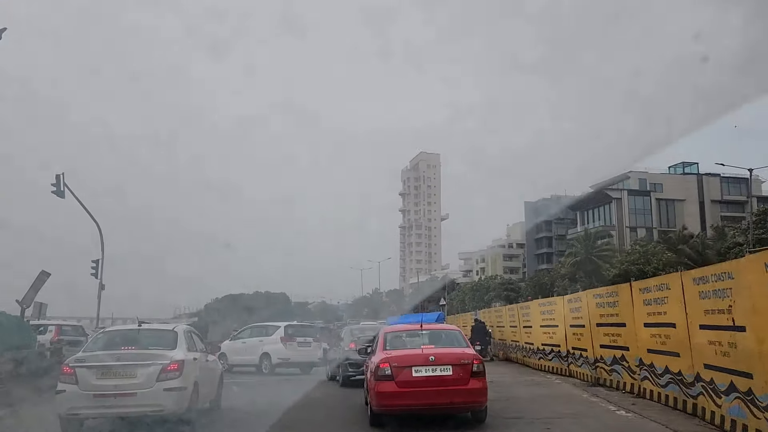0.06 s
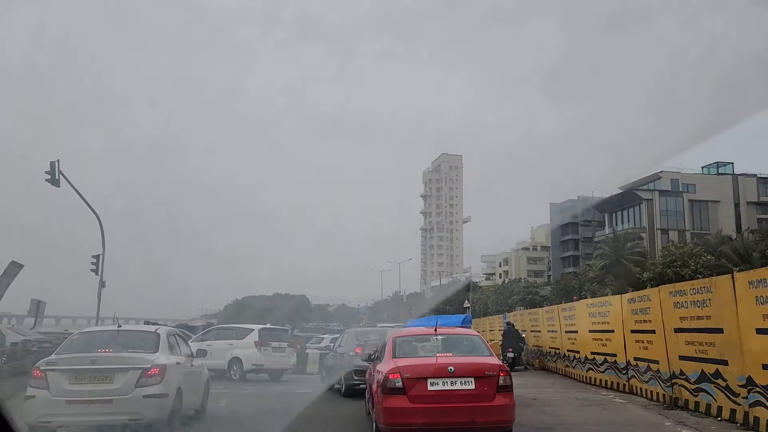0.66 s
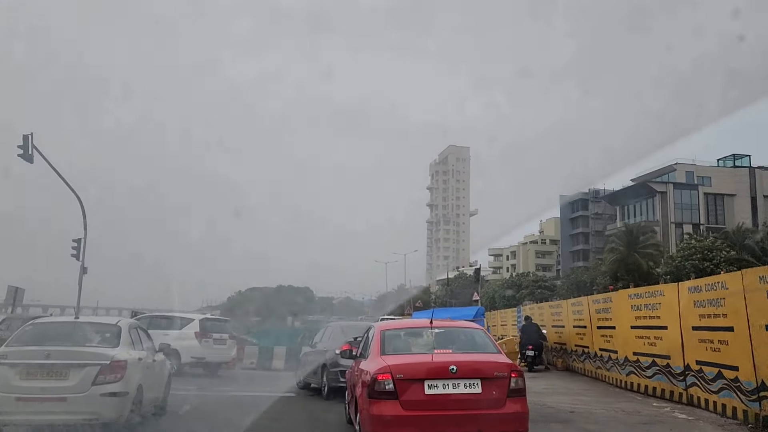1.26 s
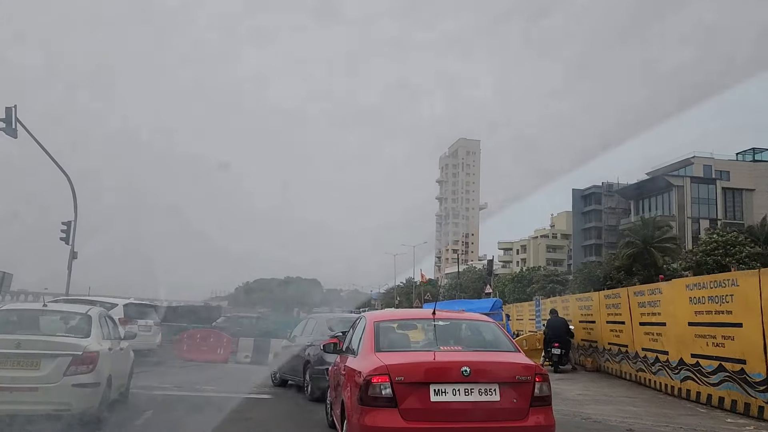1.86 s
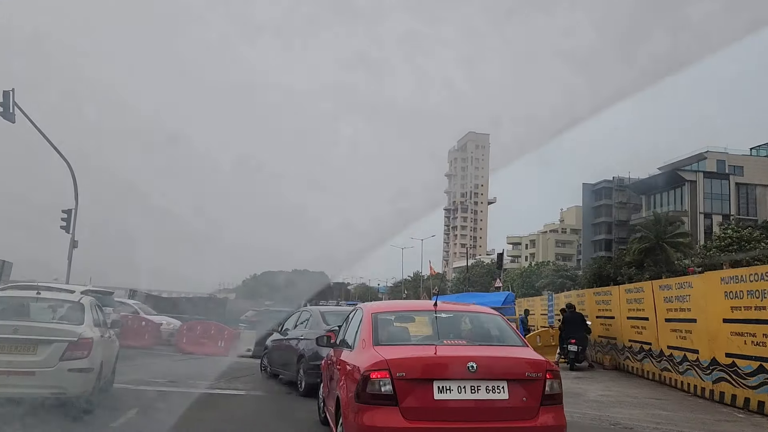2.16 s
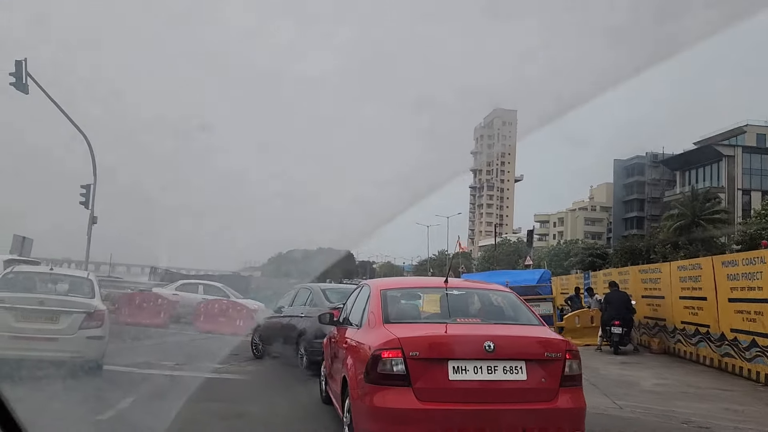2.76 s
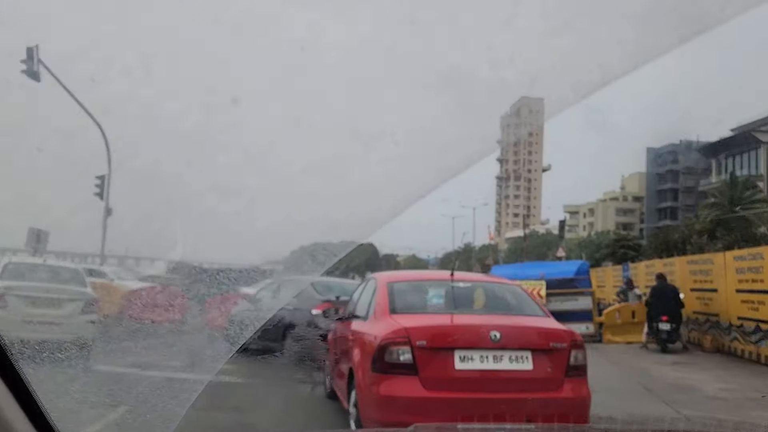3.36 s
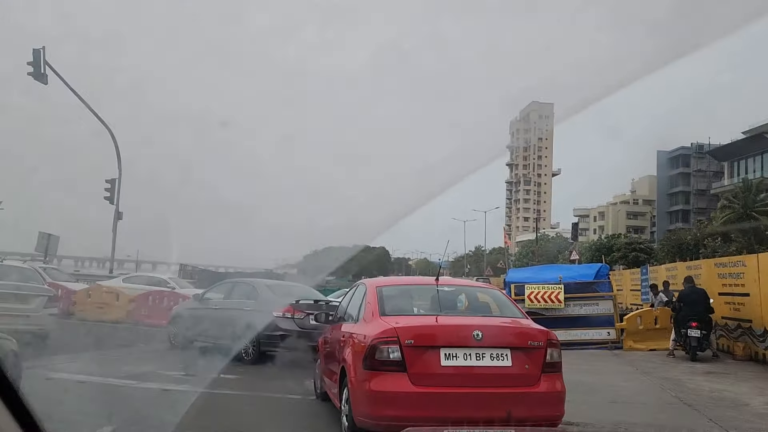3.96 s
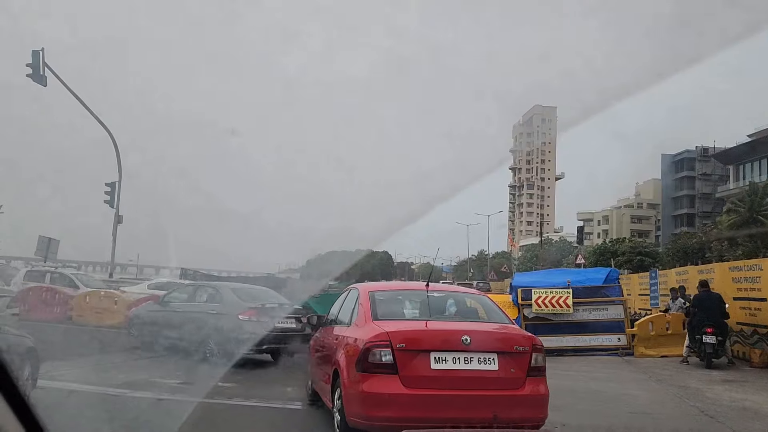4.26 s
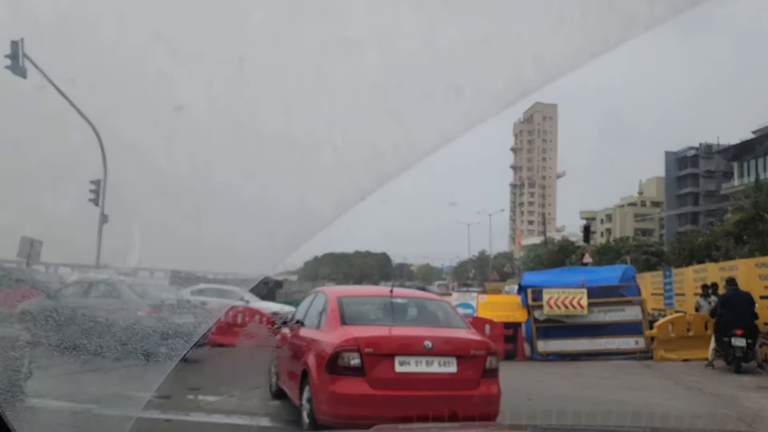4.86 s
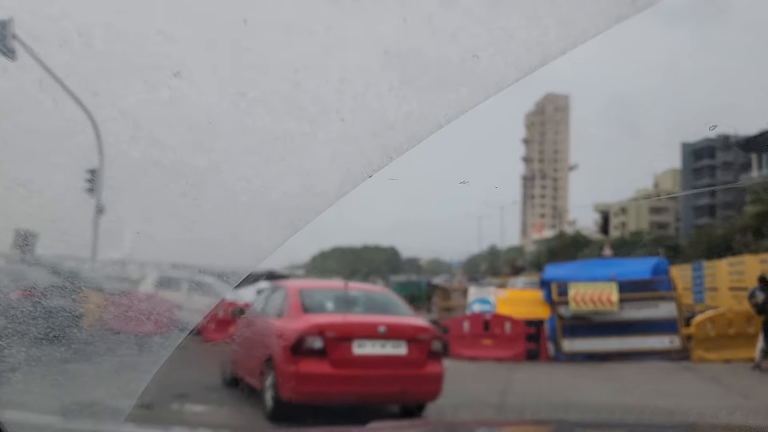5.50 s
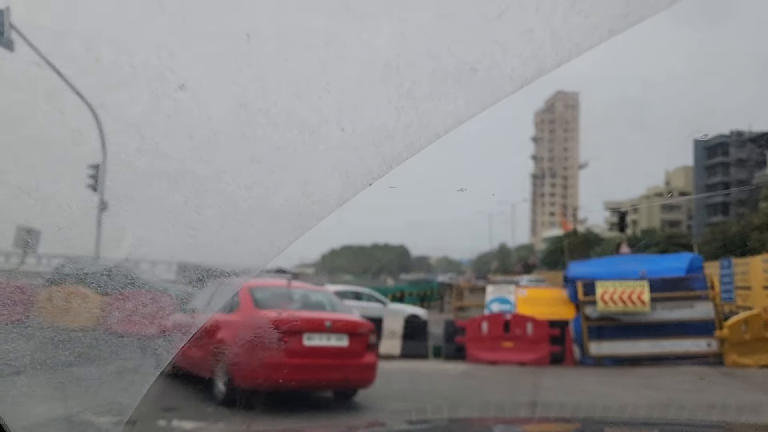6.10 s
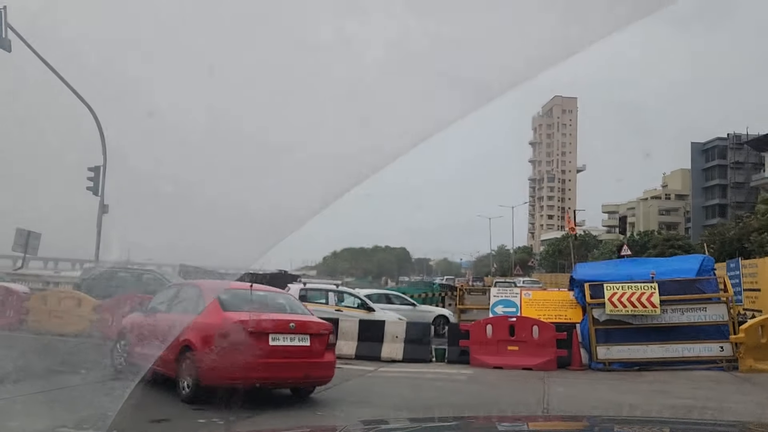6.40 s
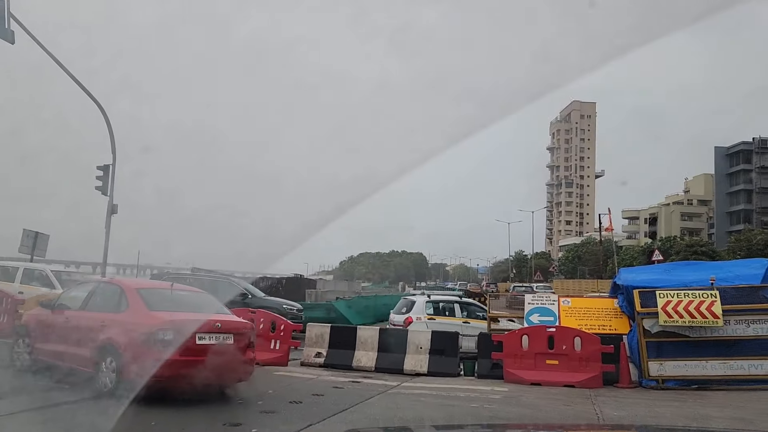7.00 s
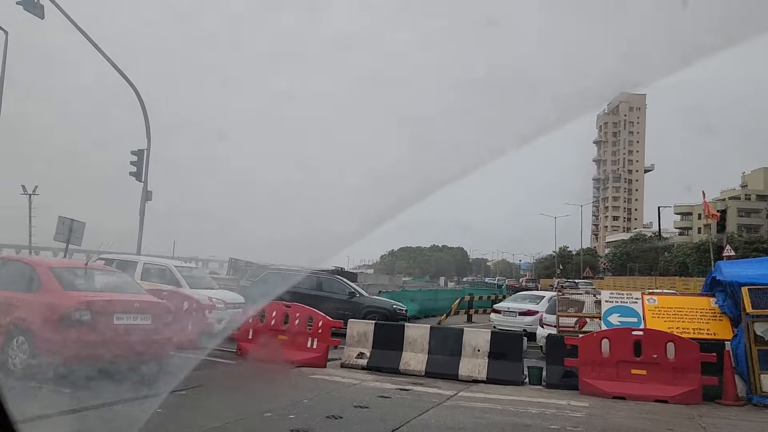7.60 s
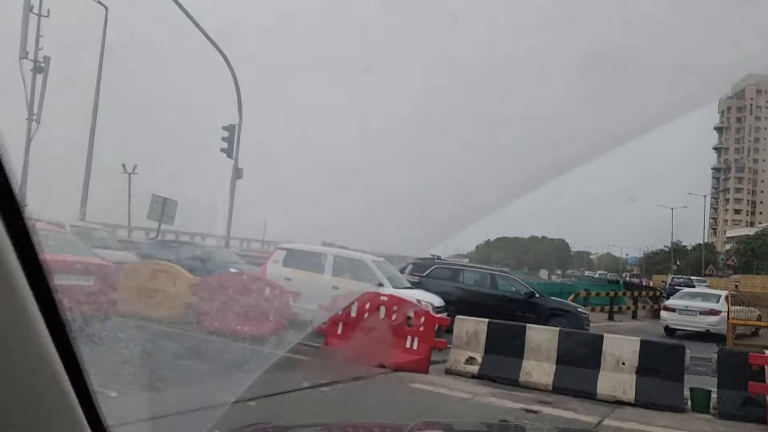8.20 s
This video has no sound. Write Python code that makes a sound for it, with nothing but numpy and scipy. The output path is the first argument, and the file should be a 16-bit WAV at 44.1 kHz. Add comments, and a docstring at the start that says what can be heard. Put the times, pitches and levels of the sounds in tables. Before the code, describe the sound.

Heard from the cabin, a car rumbles slowly along, settles to idle and accelerates gently under a steady rush of vent air.

```python
"""Inside a small car in slow traffic. Vents blow throughout; air noise rings in the cabin's resonances.
First the car creeps: tyres rumble and boom through the body, the trim ticks and rustles.
From 1 s brakes sing faintly; the engine's firing hum sinks to idle by 2.6 s.
A plastic panel knocks twice near 3 s; a soft cabin hum swells near 4 s; one thin squeak at 4.6 s.
From 5.7 s the engine lugs and pulls away, with brief high squeals, intake hiss, bumps and rustles."""
import sys
import numpy as np
from scipy import signal
from scipy.fft import rfft, irfft
from scipy.io import wavfile
from scipy.ndimage import uniform_filter1d

SR = 44100
rng = np.random.default_rng(int(sys.argv[2]) if len(sys.argv) > 2 else 0)


def generate_wav(signal):
    """Clip the signal to [-1, 1] and save it as 16-bit WAV at the path in sys.argv[1]."""
    frames = np.transpose(np.atleast_2d(signal))
    scaled = np.clip(frames, -1, 1) * 32767
    pcm = np.round(scaled).astype(np.int16)
    wavfile.write(sys.argv[1], SR, pcm)


N = 363825
T = np.arange(N) / SR
HZ = np.fft.rfftfreq(N, 1 / SR)

# road roughness: t/s, relative level/dB
ROAD_ROUGHNESS = [(0, -24), (.75, -19.5), (1.7, -22.5), (2.7, -29.5), (4.2, -30.5), (5.3, -30.5),
                  (6.1, -28.5), (7, -27), (8.25, -25.5)]
# engine run: t/s, firing rate/Hz, level/dB
ENGINE_RUN = [(0.0, 33.1, -28), (0.37, 33, -27), (0.82, 32.58, -30), (1.08, 33.36, -22), (1.28, 32.93, -24),
              (1.65, 31.8, -23), (2.04, 29.44, -44), (2.59, 26.07, -42), (3.2, 28.45, -26),
              (3.42, 25.46, -35.5), (5.7, 24.26, -36), (6.2, 28.45, -29), (6.54, 30.61, -29.5),
              (6.68, 32.62, -18), (6.88, 33.06, -13.5), (6.99, 33.6, -13), (7.05, 35.23, -25),
              (7.13, 37.5, -16.5), (7.33, 39.3, -22.5), (7.6, 43.38, -18.5), (7.94, 44.4, -32),
              (8.25, 44.2, -21.5)]


def gain_of(db):
    """Decibels to amplitude."""
    return 10 ** (np.asarray(db) / 20)


def unit_rms(x):
    """Scales to rms 1."""
    return x / np.sqrt(np.mean(x ** 2) + 1e-20)


def curve(rows, column=1):
    """One column of (t/s, ...) rows, interpolated over time."""
    columns = np.transpose(rows)
    return np.interp(T, columns[0], columns[column])


def spectrum(points):
    """(f/Hz, value) points, interpolated over log frequency."""
    hz, value = np.transpose(points)
    return np.interp(np.log(HZ + 1), np.log(hz + 1), value)


def noise(points):
    """Noise of rms 1, shaped by (f/Hz, density/dB) points."""
    return unit_rms(irfft(rfft(rng.standard_normal(N)) * gain_of(spectrum(points)), N))


def drift(rate_hz):
    """Low-passed random wander of rms 1."""
    return unit_rms(irfft(rfft(rng.standard_normal(N)) / (1 + (HZ / rate_hz) ** 4), N))


def panned(x, left_db):
    """Stereo placement by left-right level difference."""
    return x * gain_of(left_db * np.array([[.5], [-.5]]))


def add(mix, start_s, sound):
    """Adds a sound to the mix in place."""
    part = mix[max(round(start_s * SR), 0):][:len(sound)]
    part += sound[:len(part)]


def swells(rows, taper=1):
    """Smooth envelope of (t/s, length/s, level/dB) events; taper < 1 leaves a hold."""
    out = np.zeros(N)
    for start_s, length_s, db in rows:
        add(out, start_s, gain_of(db) * signal.windows.tukey(int(length_s * SR), taper))
    return out


def whistle(envelope, hz, wander_hz, wander_per_s, left_db, lead_rad, waver_db):
    """Thin tone wandering in pitch and level; fast wander makes it rough."""
    phase = 2 * np.pi * np.cumsum(hz + wander_hz * drift(wander_per_s)) / SR
    tone = np.sqrt(2) * np.sin([phase + lead_rad, phase])
    return panned(tone * envelope * gain_of(waver_db * drift(19)), left_db)


def vents(mid_db=-41, side_db=-47, flutter_db=0.94, idle_hz=26, rise_db_per_hz=0.068):
    """Fluttering rush of air, wide in the treble, growing slightly with engine speed."""
    mid_shape = [(110, -22), (180, -1.5), (220, -4), (340, -7), (480, -9.5), (650, -17), (1100, -24.5),
                 (1650, -26), (2150, -26), (2650, -31.5), (4700, -35.5), (5850, -37), (8000, -37.5),
                 (9700, -52.5), (15400, -60.5)]  # in-phase air: f/Hz, density/dB
    side_shape = [(60, -27), (110, -6), (220, -10), (420, -9.5), (650, -12), (1100, -17.5), (1650, -15),
                  (2650, -27.5), (4700, -27.5), (5850, -32.5), (8000, -37), (9700, -45.5), (15400, -53.5)]  # antiphase air: f/Hz, density/dB
    balance = [(150, 7), (400, 2.5), (600, 0.5), (1100, 2), (1600, 1.5), (2600, -1), (3800, -1.5),
               (5800, -1), (7300, 4.5), (8600, -3), (15000, 3)]  # stereo tilt: f/Hz, left-right/dB
    mid = gain_of(mid_db) * noise(mid_shape)
    side = gain_of(side_db) * noise(side_shape)
    rush = irfft(panned(rfft([mid + side, mid - side]), spectrum(balance)), N)
    return rush * gain_of(rise_db_per_hz * (curve(ENGINE_RUN) - idle_hz) + flutter_db * drift(22))


def cabin(swell_db=1.46, swells_per_s=2):
    """Standing waves excited by air and road noise, each slowly swelling and sinking."""
    # cabin and duct modes: f/Hz, width/Hz, level/dB, left-right/dB, left phase lead/rad
    modes = [(163.8, 45, -43, 0.5, 0), (281.3, 38, -47.5, 2, -1), (392.6, 58, -50, 2.5, 1),
             (605.3, 46, -52.5, 2.5, 1), (686, 34, -55, -1, 0.9), (750, 54, -55.5, -3, 1.5),
             (841, 69, -53.5, 2, -2), (939, 54, -61, -8, 1.4), (1010, 37, -62.5, 9.5, 1.5),
             (1093, 28, -65.5, 10, 1.5), (1193, 52, -64, 7.5, 2), (1325, 66, -57.5, -1, 2.5),
             (1417, 75, -61.5, 8, 1.5), (1540, 80, -59.5, -5.5, -2), (1730, 76, -64, 6.5, 2),
             (1943, 80, -64.5, 2.5, 1.5), (2136, 400, -60, -1.5, 1.5), (2750, 190, -70, 8, 2),
             (3040, 100, -65, 3.5, 4), (3440, 150, -69, 0.5, 2.5), (4170, 500, -69.5, -8.5, 0.5),
             (5370, 300, -71, 2.5, 2), (6550, 400, -67, -5, 3.5), (7370, 370, -68.5, -11, 2.5),
             (8380, 300, -73.5, 4.5, 2.5)]
    out = np.zeros((2, N))
    for hz, width_hz, db, left_db, lead_rad in modes:
        band = rfft(rng.standard_normal(N)) / (1 + ((HZ - hz) / (0.6 * width_hz)) ** 2)
        ring = irfft([band, band * np.exp(-1j * lead_rad)], N)
        ring *= gain_of(swell_db * drift(swells_per_s))
        out += gain_of(db) * panned(unit_rms(ring), left_db)
    return out


def fan(db=-67.5):
    """Thin, continuous whine, as of the fan motor."""
    return whistle(gain_of(db), hz=1513, wander_hz=2.54, wander_per_s=8.4,
                   left_db=-5.5, lead_rad=-1.8, waver_db=3.5)


def squeak(start_s=4.555, length_s=0.085, hz=11230, db=-65):
    """One thin, very high squeak on the left."""
    out, t = np.zeros(N), T[:int(length_s * SR)]
    add(out, start_s, gain_of(db) * np.hanning(len(t)) * np.sin(2 * np.pi * hz * t))
    return panned(out, left_db=11)


def brakes():
    """Faint squeals: low and thin on the right, high and rough on the left."""
    squeals = [(.95, .55, 1259, 4, -66), (1.52, .2, 1510, 2.4, -57.5), (1.7, 1.5, 1505, 2.4, -61.5),
               (1.48, .32, 1552, 12, -59), (2.2, 0.69, 1548, 16, -64), (2.58, .24, 1500, 6, -60),
               (6.355, 0.059, 5145, 35, -65), (6.46, .29, 5350, 170, -66.5), (6.65, .09, 5270, 170, -65)]  # brake tones: t/s, length/s, f/Hz, wander/Hz, level/dB
    # path into the cabin: f/Hz, left-right/dB, left phase lead/rad, wander rate/Hz
    paths = [(1550, -7.5, -1.5, 30), (5200, 4, 1.5, 140)]
    path_hz, *columns = np.transpose(paths)
    out = np.zeros((2, N))
    for start_s, length_s, hz, wander_hz, db in squeals:
        left_db, lead_rad, wander_per_s = (np.interp(hz, path_hz, column) for column in columns)
        envelope = swells([(start_s, length_s, db)], taper=.45)
        out += whistle(envelope, hz, wander_hz, wander_per_s, left_db, lead_rad, waver_db=1)
    return out


def trim(tick_t60_s=.06, faint_db=-75, faint_per_s=9, chafe_db=-50,
         slips_per_s=420, slip_spread_db=3.5, slip_decay_s=.0012, smooth_share=.52):
    """Loose trim: soft-edged ticks and crackling rubs over chafing that follows the road."""
    tick_events = [(0.0553, -60), (0.185, -55), (0.3591, -58), (0.4953, -58), (0.7846, -59), (1.404, -62),
                   (2.3261, -58), (2.9113, -59), (3.1637, -57), (4.9394, -62), (7.0599, -58),
                   (7.1696, -53.5), (7.654, -51.5)]  # trim ticks: t/s, relative level/dB
    rustles = [(0.085, 0.125, -62.5), (1.98, .33, -70), (2.62, 0.09, -65), (3.04, 0.15, -62),
               (7.04, 0.092, -62), (7.4, 0.14, -55.5), (7.7, 0.095, -62.5), (7.8, 0.085, -63.5)]  # soft rubs: t/s, length/s, level/dB
    colour = [(500, -16), (1500, 1), (4000, -2), (7500, 1), (10000, -5), (15000, -4)]  # trim noise: f/Hz, density/dB
    blows = np.zeros(N)
    for start_s, db in tick_events:
        add(blows, start_s, gain_of([db + .8]))
    blows += gain_of(faint_db + 2 * rng.standard_normal(N)) * (rng.random(N) < faint_per_s / SR)
    ticks = signal.oaconvolve(blows, gain_of(-60 * T[:SR // 4] / tick_t60_s))[:N]
    ticks = uniform_filter1d(ticks, size=200)
    chafe = gain_of(chafe_db + curve(ROAD_ROUGHNESS) + 1.8 * drift(9))
    slips = gain_of(slip_spread_db * np.minimum(rng.exponential(1, N), 2))
    slips *= rng.random(N) < slips_per_s / SR
    crackle = unit_rms(signal.oaconvolve(slips, np.exp(-T[:SR // 50] / slip_decay_s))[:N])
    rub = swells(rustles, taper=0.46) * (smooth_share + (1 - smooth_share) * crackle)
    grain = gain_of(2 * drift(150))
    envelope = np.hypot(ticks + rub, chafe) * grain
    return panned(envelope * np.array([noise(colour), noise(colour)]), left_db=2.5)


def scuff(start_s=7.435, length_s=.05, db=-53):
    """Short swish under the trim's strongest rub."""
    colour = [(800, -20), (2500, -4), (4500, 0), (7000, -3), (9000, -10), (15000, -22)]  # swish: f/Hz, density/dB
    return swells([(start_s, length_s, db)]) * np.array([noise(colour), noise(colour)])


def knocks(thud_db=-4, thud_t60_s=0.07, off_mode_db_per_octave=-22):
    """A plastic panel thuds and rings briefly; each knock favours different modes."""
    strikes = [(3.02, -44, 1270), (3.163, -37.5, 1720)]  # knocks: t/s, level/dB, favoured f/Hz
    modes = [(687, -3, .04), (1050, 4, 0.043), (1260, 4, 0.12), (1734, -1, 0.1), (1950, 6, .06),
             (3105, -10, .02)]  # panel modes: f/Hz, relative level/dB, t60/s
    thud_shape = [(200, -14), (600, 7), (2000, 3), (4000, -25), (9000, -35)]  # f/Hz, density/dB
    out, t = np.zeros(N), T[:SR // 5]
    thud = noise(thud_shape)[:len(t)] * gain_of(thud_db - 60 * t / thud_t60_s)
    for start_s, db, favoured_hz in strikes:
        ring = np.zeros(len(t))
        for hz, mode_db, t60_s in modes:
            struck_db = mode_db + off_mode_db_per_octave * abs(np.log2(hz / favoured_hz))
            ring += gain_of(struck_db - 60 * t / t60_s) * np.sin(2 * np.pi * hz * t)
        add(out, start_s, gain_of(db) * (ring / abs(ring).max() + thud))
    return panned(out, left_db=1.5)


def firing_cycles(jitter=0.0052):
    """Running count of firings, with slightly uneven combustion."""
    return np.cumsum(curve(ENGINE_RUN) * (1 + jitter * drift(12))) / SR


def throttle(lead_s=0.14, full_pull_hz_per_s=11.2):
    """Opening, 0 to 1; opens just before the engine gains speed."""
    pull_hz_per_s = uniform_filter1d(np.gradient(curve(ENGINE_RUN), T), size=SR * 3 // 4)
    return np.clip(np.interp(T + lead_s, T, pull_hz_per_s) / full_pull_hz_per_s, 0, 1)


def intake(cycles, shut_db=-70, open_db=-53.5, throb_db=4):
    """Air drawn in one gulp per firing, louder as the throttle opens."""
    colour = [(500, -19), (830, 8), (1100, -11), (1410, 7.5), (1700, -22.5), (2300, -11.5), (2800, -17),
              (3450, -3.5), (4500, -20.5), (9000, -33.5)]  # intake hiss: f/Hz, density/dB
    level_db = shut_db + (open_db - shut_db) * throttle()
    gulps = gain_of(level_db + throb_db * np.cos(2 * np.pi * cycles))
    return gulps * np.array([noise(colour), noise(colour)])


def belt(cycles, ratio=3.75, waver_db=1.5, load_db=-4):
    """Belt-driven accessory hum: loudest at cabin resonances, softer under load."""
    response = [(100, -47.5), (118, -30.5), (127, -33), (145, -39), (164, -36.5), (175, -44)]  # hum as the cabin passes it: f/Hz, level/dB
    level_db = np.interp(ratio * curve(ENGINE_RUN), *np.transpose(response)) + load_db * throttle()
    return np.sqrt(2) * gain_of(level_db + waver_db * drift(4.4)) * np.sin(2 * np.pi * ratio * cycles)


def engine(cycles, waver_db=1):
    """Firing pulses reach the cabin as low orders."""
    orders = [(1, -0.6), (1.5, -16), (2, -18), (3, -23.5), (4, -27.5)]  # engine orders: multiple of firing rate, relative level/dB
    boom = np.zeros(N)
    for order, db in orders:
        boom += gain_of(db + waver_db * drift(7.5)) * np.sin(2 * np.pi * (order * cycles + rng.random()))
    return np.sqrt(2) * gain_of(curve(ENGINE_RUN, column=2)) * boom


def tyres(gain_db=1, steadiness=0.87, side_db=-21.5, uneven_db=0.78, uneven_per_s=7):
    """The uneven road shakes the body, nearly in mono; brief low tones swell with extra rumble."""
    body = [(13, -26), (22, -3), (44, 1), (55, -3.5), (67, -1), (76, -4), (85, 1.5), (102, -6.5),
            (120, -1.54), (138, -9), (172, -16), (205, -26), (300, -33), (600, -49.5), (2000, -100)]  # body rumble: f/Hz, density/dB
    # road bumps, plus a soft 168 Hz cabin hum swelling at idle near 4 s:
    # t/s, length/s, f/Hz, tone peak/dB, rumble level/dB
    booms = [(0, 0.15, 119.9, -17, -20), (.03, 0.32, 293, -41.5, -35), (0.022, 0.33, 23.2, -16, -36),
             (0.321, 0.32, 42.9, -17.5, -25), (0.471, 0.25, 65.4, -15.5, -29), (0.651, .22, 66.4, -11, -26),
             (0.761, 0.12, 116, -18, -28), (0.821, 0.33, 23.1, -17, -33), (1.35, 0.18, 65.5, -15.5, -28),
             (2.774, 0.19, 278, -39.5, -28), (3.8, 0.543, 168, -35, -49), (5.718, 0.16, 285, -37.5, -40),
             (6.72, 0.16, 66.8, -19, -20.5), (7.319, 0.21, 82, -19, -38), (7.29, 0.16, 280.7, -38.5, -40),
             (7.77, 0.19, 110.3, -21.5, -25)]
    shake, boom = noise(body), np.zeros(N)
    running_rms = np.sqrt(uniform_filter1d(shake ** 2, size=7000) + 1e-9)
    mid = unit_rms(shake / running_rms ** steadiness)
    side = gain_of(side_db) * noise(body) * [[1], [-1]]
    envelope = gain_of(curve(ROAD_ROUGHNESS) + gain_db + uneven_db * drift(uneven_per_s))
    for start_s, length_s, hz, tone_db, rumble_db in booms:
        t = T[:int(length_s * SR)]
        add(boom, start_s, gain_of(tone_db) * np.hanning(len(t)) * np.sin(2 * np.pi * hz * t))
        envelope = np.hypot(envelope, swells([(start_s, length_s, rumble_db)]))
    return envelope * (mid + side) + boom


def scene():
    """Nearly mono bass under wide air noise and small cabin sounds."""
    cycles = firing_cycles()
    bass = panned(engine(cycles) + belt(cycles) + tyres(), left_db=1.76)
    air = fan() + intake(cycles) + vents() + cabin()
    return bass + air + brakes() + trim() + scuff() + knocks() + squeak()


def record(dry, fade_s=.006, cutoff_hz=15550):
    """Short fade at both ends, then a low-pass."""
    faded = dry * np.minimum(np.minimum(T, T[::-1]) / fade_s, 1)
    lowpass = signal.firwin(511, cutoff_hz, window=("kaiser", 9), fs=SR)
    return signal.oaconvolve(faded, lowpass[None], "same")


dry = scene()
out = record(dry)
generate_wav(out)
```